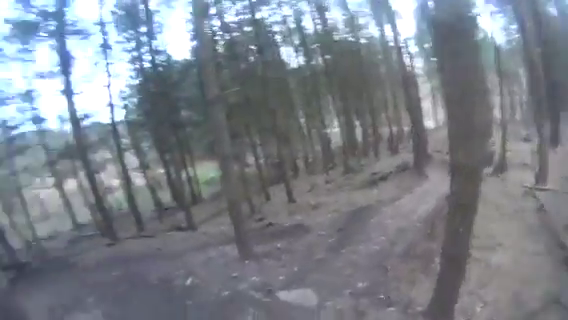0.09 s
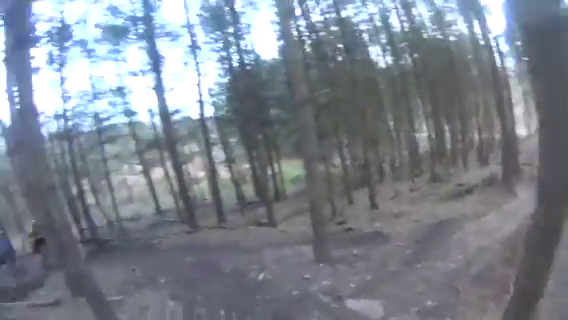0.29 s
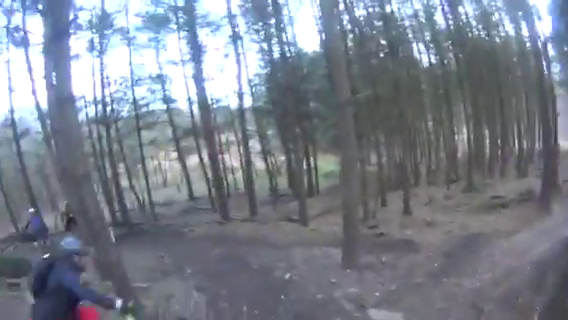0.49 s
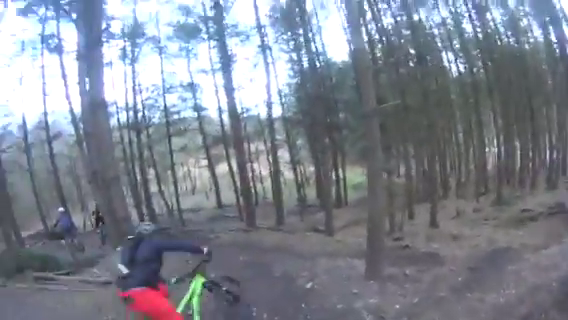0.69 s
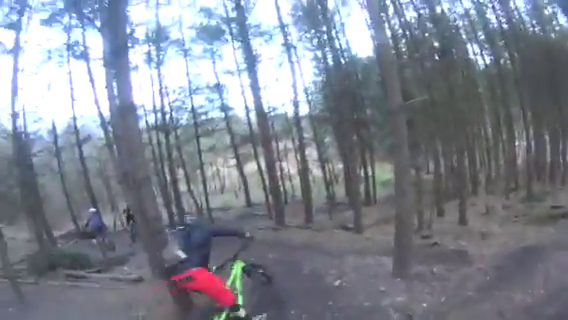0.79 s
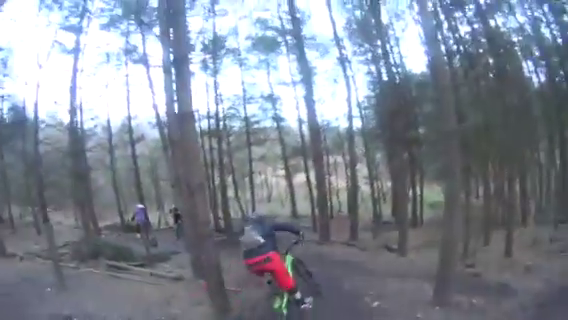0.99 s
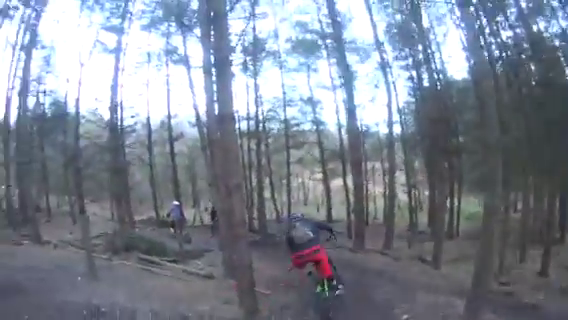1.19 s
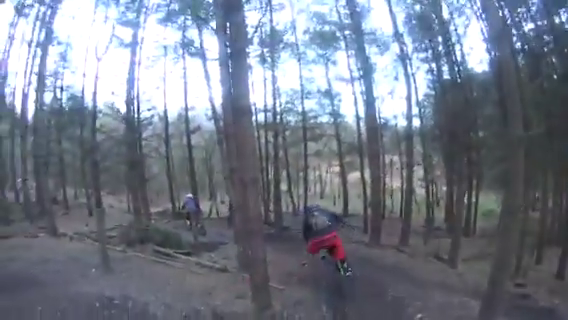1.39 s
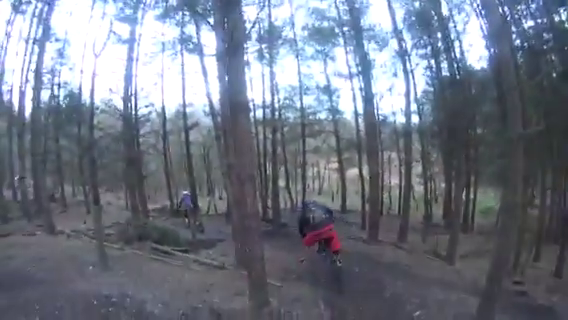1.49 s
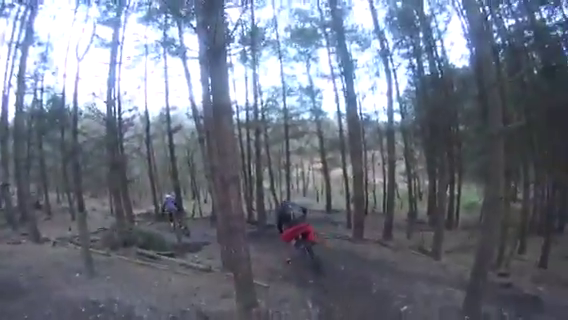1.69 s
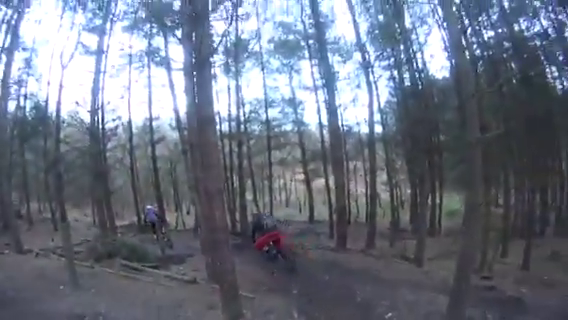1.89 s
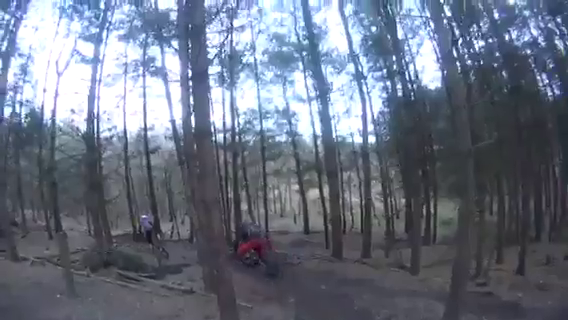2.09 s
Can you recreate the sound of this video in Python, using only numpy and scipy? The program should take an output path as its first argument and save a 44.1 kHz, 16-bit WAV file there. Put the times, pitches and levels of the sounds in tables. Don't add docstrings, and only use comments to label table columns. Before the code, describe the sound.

A mountain bike skids through a dirt turn close by, stones cracking, then rolls away in wind

```python
import sys
import numpy as np
from scipy import signal
from scipy.fft import rfft, irfft
from scipy.io import wavfile
from scipy.ndimage import uniform_filter1d

SR = 44100
rng = np.random.default_rng(int(sys.argv[2]) if len(sys.argv) > 2 else 0)


def bounce(signal):
    frames = np.transpose(np.atleast_2d(signal))
    limited = np.clip(frames, -1, 1)
    pcm = np.round(limited * 32767).astype(np.int16)
    wavfile.write(sys.argv[1], SR, pcm)


def field_ratio(decibels):
    return 10 ** (np.asarray(decibels, dtype=float) / 20)


N = 92610
T = np.arange(N) / SR
HZ = np.fft.rfftfreq(N, 1 / SR) + 1

# time in seconds, level in dB, brightness in dB, left over right in dB.
ROLL_PASS = [(0, -38.5, -12, 3), (.1, -44, -9, 3), (.18, -39, -7, 3), (0.301, -36, -4.5, 2),
             (.41, -37.5, -2, 3.5), (.5, -31.5, -9.5, 6.5), (.615, -33, -8, 2), (.645, -31.5, 1, 1.5),
             (.73, -33, 0.5, 3), (.83, -35.5, 4, 1.5), (1.0, -39.5, 2.5, 1.1), (1.12, -40.5, 6, 1),
             (1.23, -40.5, 1.5, 1), (1.31, -42, 0, 1), (1.42, -42, 1, 0.5), (1.7, -41, 0, 1),
             (2.1, -43, 2, 1.3)]
# frequency in Hz, gain in dB.
GRIT_COLOUR = [(250, -21), (800, -11), (1050, -4.5), (1930, -9), (3000, -1), (4000, -6.5), (9000, -7),
               (11100, -13)]
# time in seconds, length in seconds, rise in dB.
WHEEL_BUMPS = [(0.654, 0.0054, 3.5), (0.708, 0.01, -1.5), (0.865, 0.0065, 3), (0.944, 0.0061, 4),
               (0.988, 0.0058, 1.5), (1.037, 0.0077, 6.5), (1.247, 0.009, 4.5), (1.498, 0.018, 2.5),
               (1.04, 0.0035, 0), (1.654, 0.0033, 3), (1.749, 0.0041, -1), (1.88, 0.004, -1),
               (1.938, 0.015, 2.5), (2.071, 0.0065, 2.5)]
GROUND_BANDS_HZ = [0, 900, 1900, 2750, 3400, 4300, 5600, 7000, 9300, 12000]
# time in seconds, level in dB, grain pitch in Hz, spray in dB.
SKID_COURSES = [
    [(.185, -40, 2400, -10), (.204, -31, 2400, -12), (.225, -39, 2400, -10), (.253, -39, 2600, -6),
     (.263, -27, 2700, -8), (.269, -31, 1900, -7), (.277, -22, 1900, -7), (.289, -21, 2600, -10),
     (.302, -33, 1900, -12)],
    [(.428, -34, 1500, -14), (.448, -21.5, 1750, -18), (.466, -18.5, 1900, -14), (.49, -18, 2450, -11),
     (.524, -20, 2350, -11), (.555, -16.5, 2150, -11), (.591, -24, 1900, -12), (.612, -20, 2050, -19),
     (.621, -33, 2200, -20)],
    [(.73, -33, 1800, -6), (.752, -27, 1850, -5), (.775, -25, 2100, -8), (.784, -29, 2400, -5),
     (.79, -23, 2900, -2), (.806, -21, 2200, -5), (.815, -27, 1500, -7), (.822, -38, 1800, -6)],
]
# time in seconds, length in seconds, change in dB.
GRIP_LOSSES = [
    (0.459, 0.0018, -1),
    (0.505, 0.0014, -14),
    (.5075, 0.0017, -11),
    (0.513, .001, -2),
    (0.521, .002, -6),
    (0.565, 0.0015, -5),
    (0.59, 0.0015, -6),
    (0.774, .002, -7),
    (0.807, 0.0011, -9),
]
# time in seconds, peak in dB, pitch in Hz.
STONE_CRACKS = [(0.2045, -22, 2470), (0.2051, -25, 1370), (0.2088, -26, 2670), (0.4473, -18, 2510),
                (0.4517, -14, 1420), (0.4662, -17, 2590), (0.4691, -14, 1330), (0.4755, -15, 2650),
                (0.4793, -13, 2520), (0.484, -12, 2480), (0.4877, -11, 2770), (0.4945, -16, 2680),
                (0.5008, -12, 2640), (0.5053, -12, 2630), (0.5096, -12, 2500), (0.5141, -13, 2810),
                (0.5203, -16, 2580), (0.5311, -16, 2630), (0.5328, -16, 1220), (0.5376, -14, 2630),
                (0.5431, -14, 2270), (0.5479, -17, 1510), (0.5498, -15, 2490), (0.5528, -14, 2700),
                (0.556, -14, 1330), (0.5595, -16, 2500), (0.5678, -17, 2380), (0.5687, -13, 1330),
                (0.582, -17, 1400), (0.5836, -18, 2550), (0.5977, -13, 2350), (0.6012, -16, 2180),
                (0.6014, -17, 1320), (0.6046, -13, 1400), (0.6047, -18, 2240), (0.6093, -13, 2330),
                (0.6145, -18, 2370), (0.6541, -23, 3330), (0.6568, -22, 2720), (0.6639, -22, 2880),
                (0.6715, -23, 2700), (0.7201, -24, 2890), (0.7526, -21, 1580), (0.753, -19, 2420),
                (0.7756, -18, 2460), (0.7864, -15, 2910), (0.7926, -18, 3270), (0.8002, -17, 3280),
                (0.8061, -15, 2790), (0.8067, -16, 1370), (0.8529, -22, 2950), (0.861, -23, 2850),
                (0.9439, -25, 2900), (0.9875, -28, 2760), (1.0318, -26, 3040), (1.0365, -26, 3230),
                (1.6494, -30, 3310), (1.7487, -30, 2860)]
# time in seconds, length in seconds, level in dB, pitch in Hz.
SCRAPE_RINGS = [
    (0.277, 0.0035, -23, 1386),
    (0.2813, 0.002, -20, 2595),
    (0.289, 0.0009, -12, 2520),
    (0.2908, 0.0022, -18, 2560),
    (0.263, 0.003, -28, 2600),
    (0.464, 0.004, -22, 1453),
]
# frequency in Hz, dB per Hz.
WIND_COLOUR = [(15, -2), (37, -3.5), (64, -11.5), (110, -9), (162, -3.5), (200, -8), (280, -21.5),
               (600, -18.5)]
# time in seconds, level in dB.
WIND_GUSTS = [(0, -41.5), (.12, -42.5), (.3, -45), (.43, -42.5), (.6, -50), (.8, -45.5), (.95, -53),
              (1.13, -52.5), (1.3, -47.5), (1.55, -54), (1.65, -53), (1.801, -46), (1.95, -55), (2.1, -52)]
# time in seconds, length in seconds, level in dB, pitch in Hz.
HOUSING_HUMS = [
    (.068, .016, -28.5, 164.8),
    (.155, 0.02, -39.5, 153),
    (.21, 0.023, -38.5, 178),
    (.378, 0.008, -33, 158),
    (.42, 0.011, -31, 178),
    (.595, 0.01, -38, 156),
    (0.723, 0.0086, -32.5, 149),
    (1.285, 0.011, -38, 161),
    (1.85, 0.047, -51, 155.3),
    (2.03, 0.011, -44, 166),
]
# time in seconds, length in seconds, size in dB, swing in cycles, signed factor.
WIND_THUDS = [
    (0.532, 0.006, -34, 0.14, -1.65),
    (0.68, 0.0047, -23, 0.46, 0.79),
    (.722, 0.0057, -28.5, .12, -1.26),
    (0.728, 0.02, -36, .1, 1),
    (1.38, 0.044, -36.5, 0.41, 0.55),
    (1.503, 0.0097, -29, 0.53, -0.51),
    (1.669, 0.01, -38, 0.66, 0.79),
]
# frequency in Hz, width in Hz, gain in dB.
COVER_RESONANCES = [(1157, 113, 2.5), (1412, 560, 8), (1813, 310, -3), (2566, 450, 4), (2973, 145, 4.5),
                    (4990, 1830, 8), (5660, 470, -5), (5960, 270, 3.5), (6900, 330, -1), (8260, 3070, 5.5),
                    (9420, 260, 0), (10290, 224, 7.5)]
# frequency in Hz, lead in radians.
LEFT_LEAD = [(30, 0.11), (170, 0.64), (690, 1.79), (1300, 1.74), (2550, 0.97), (2950, 1.24), (5700, 0.48),
             (11000, 0.83)]
# frequency in Hz, dB against the shared sound.
PORT_DIFFERENCE = [(30, -13), (170, -13.5), (300, -1.5), (600, -8), (1200, -8), (2500, -10.5), (5000, -6),
                   (10000, -26)]


def unit(x):
    return x / np.sqrt(np.mean(x ** 2))


def over_hz(table):
    hz, value = np.array(table, float).T
    return np.interp(np.log(HZ), np.log(hz), value)


def shape(x, gain):
    return irfft(rfft(x) * gain, N)


def walk(rate_hz):
    k = int(SR / rate_hz)
    steps = np.repeat(rng.standard_normal(N // k + 1), k)
    return unit(uniform_filter1d(uniform_filter1d(steps, k), k)[:N])


def bell(at, length):
    return np.exp(-0.5 * ((T - at) / length) ** 2)


def ring(at, length, db, hz):
    return field_ratio(db) * bell(at, length) * np.sin(2 * np.pi * hz * (T - at))


def peak(hz, width_hz):
    return unit(shape(rng.standard_normal(N), 1 / (1 + (2 * (HZ - hz) / width_hz) ** 4)))


def waver(hz, depth, width_hz):
    turn = 2 * np.pi * np.cumsum(hz * (1 + depth * walk(24.96))) / SR
    return peak(0.0, width_hz) * np.cos(turn) + peak(0.0, width_hz) * np.sin(turn)


def grit(share, scatter_db):
    size = field_ratio(scatter_db * np.minimum(rng.exponential(size=N), 3))
    return unit(rng.standard_normal(N) * (1 + (rng.random(N) < share) * size))


def grains(at, hz, cycles, size, phase):
    offset = np.arange(256) - 64
    u = offset / SR
    w = u * hz[:, None] / cycles
    envelope = np.exp(-0.5 * np.where(w < 0, 1.4 * w, w) ** 2)
    wave = size[:, None] * envelope * np.cos(2 * np.pi * hz[:, None] * u + phase[:, None])
    where = np.clip((at[:, None] * SR).astype(int) + offset, 0, N - 1)
    return np.bincount(where.ravel(), wave.ravel(), N)


def rolling():
    s, db, bright_db, left_db = np.array(ROLL_PASS, float).T
    level = field_ratio(np.interp(T, s, db))
    bright = np.interp(T, s, bright_db)
    rise = sum(d * bell(a, n) for a, n, d in WHEEL_BUMPS)
    colour = field_ratio(over_hz(GRIT_COLOUR))
    high = 1 / (1 + (3700 / HZ) ** 6)
    crush = grit(0.01, 3.0) * field_ratio(0.9 * walk(40))
    body = unit(shape(crush, colour * (1 - high) / (1 + (220 / HZ) ** 4)))
    fade = 1 / (1 + np.exp((T - 0.46) / 0.03))
    drone = field_ratio(-15 - 0.9 * bright) * waver(700, 0.04, 130) * fade
    top_db = bright - 3.5 + 0.95 * rise + 0.6 * walk(30)
    top = unit(shape(grit(0.01, 3.0), colour * high)) * field_ratio(top_db)
    return (body * field_ratio(rise) + drone + top) * level, np.interp(T, s, left_db)


def patchy(x):
    bands = zip(GROUND_BANDS_HZ, GROUND_BANDS_HZ[1:])
    return sum(shape(x, (HZ > lo) & (HZ <= hi)) * field_ratio(1.1 * walk(14.01)) for lo, hi in bands)


def skids():
    grains_per_s, pitch_spread, scatter_db, edge_s = 1600, 0.37, 2.5, 0.008
    low = peak(1350, 880) * field_ratio(2.04 * walk(250))
    high = peak(2600, 2140) * field_ratio(2.04 * walk(250))
    thump = field_ratio(-25.5) * peak(270, 550)
    dust = grit(0.025, 4.0)
    spray = unit(shape(dust, 1 / (1 + (3500 / HZ) ** 4) / (1 + (HZ / 7500) ** 6)))
    slip_db = sum(d * bell(a, n) for a, n, d in GRIP_LOSSES)
    out = 0
    for course in SKID_COURSES:
        s, db, hz, spray_db = np.array(course, float).T
        gap, detune, size, phase = rng.random((400, 4)).T
        at = s[0] + np.cumsum(0.5 + gap) / grains_per_s
        pitch = np.interp(at, s, hz) * np.exp(pitch_spread * (2 * detune - 1))
        grain_size = 0.5 * field_ratio(scatter_db * np.minimum(-np.log(1 - size), 2))
        tear = grains(at, pitch, 1.42, grain_size, 2 * np.pi * phase)
        lean = np.clip((np.interp(T, s, hz) - 1200) / 1600, 0, 1)
        scrape = field_ratio(-1.5) * (np.sqrt(1 - lean) * low + np.sqrt(lean) * high)
        edge = np.clip(np.minimum(T - s[0], s[-1] - T) / edge_s, 0, 1)
        level = edge * field_ratio(np.interp(T, s, db) - 4.5 + slip_db)
        out = out + level * (tear + scrape + thump + field_ratio(np.interp(T, s, spray_db)) * spray)
    return out


def cracks():
    s, db, hz = np.array(STONE_CRACKS, float).T
    db = db + 4.5 * np.log2(np.minimum(hz / 2500, 1))
    rings = sum(ring(*row) for row in SCRAPE_RINGS)
    snaps = grains(s, 1.24 * hz, 0.45, field_ratio(db - 2), 2 * np.pi * rng.random(len(s)))
    stones = grains(s, hz, 1.2, field_ratio(db + 1.5), 2 * np.pi * rng.random(len(s)))
    return rings + snaps + stones


def thud(at, length, db, cycles, sign):
    phase = np.pi / 2 if cycles < 0.2 else 0.6
    return sign * field_ratio(db) * bell(at, length) * np.sin(np.pi * cycles * (T - at) / length + phase)


def wind():
    s, db = np.array(WIND_GUSTS, float).T
    colour = field_ratio(over_hz(WIND_COLOUR)) / (1 + (HZ / 600) ** 4) / (1 + (14 / HZ) ** 4)
    rumble = unit(shape(rng.standard_normal(N), colour)) * field_ratio(np.interp(T, s, db) + walk(14))
    hums = sum(ring(*row) for row in HOUSING_HUMS)
    return rumble + hums + sum(thud(*row) for row in WIND_THUDS)


def cover(x):
    gain_db = sum(db / (1 + (2 * (HZ - hz) / width) ** 2) for hz, width, db in COVER_RESONANCES)
    return shape(x, field_ratio(gain_db - 2))


def ports(x, pan_db):
    echo_s = 0.014
    turn = np.exp(0.5j * over_hz(LEFT_LEAD))
    tails = rng.standard_normal((2, 6000)) * np.exp(-np.arange(6000) / SR / echo_s)
    tails = tails / np.sqrt(np.sum(tails ** 2, axis=1, keepdims=True))
    smear = rfft(tails, N) * field_ratio(over_hz(PORT_DIFFERENCE))
    pan = field_ratio(np.array([[0.5], [-0.5]]) * pan_db)
    return pan * shape(x, np.array([turn, 1 / turn]) + smear)


def scene():
    roll, roll_pan_db = rolling()
    tyres = ports(cover(patchy(roll)), roll_pan_db)
    turn = ports(cover(skids() + cracks()), 2.5 + 0 * T)
    return tyres + turn + ports(wind(), 0 * T)


def band_limit(x):
    return signal.sosfilt(signal.butter(12, 11450, fs=SR, output="sos"), x)


def record(dry):
    limit, top_hz = 0.5, 11080
    rounded = limit * np.tanh(dry / limit)
    return band_limit(shape(rounded, HZ < top_hz))


dry = scene()
out = record(dry)
bounce(out)
```